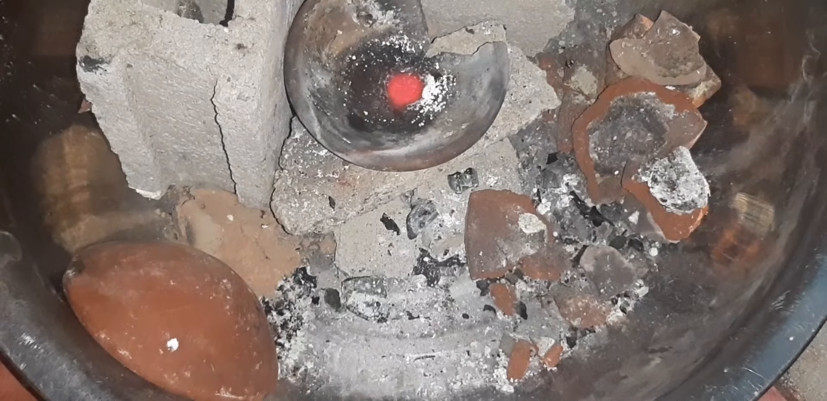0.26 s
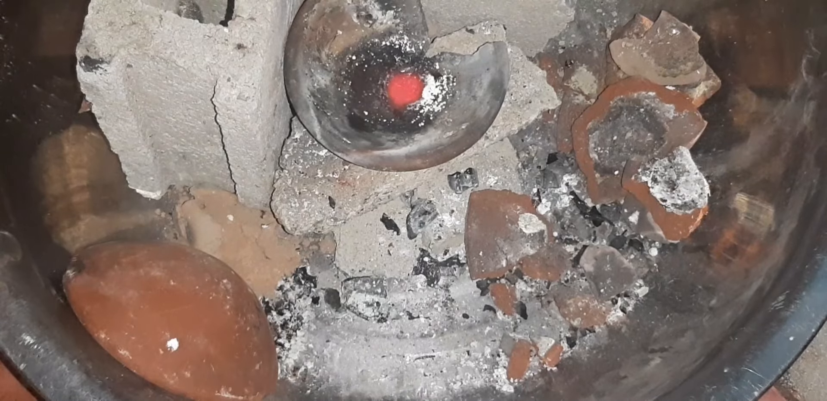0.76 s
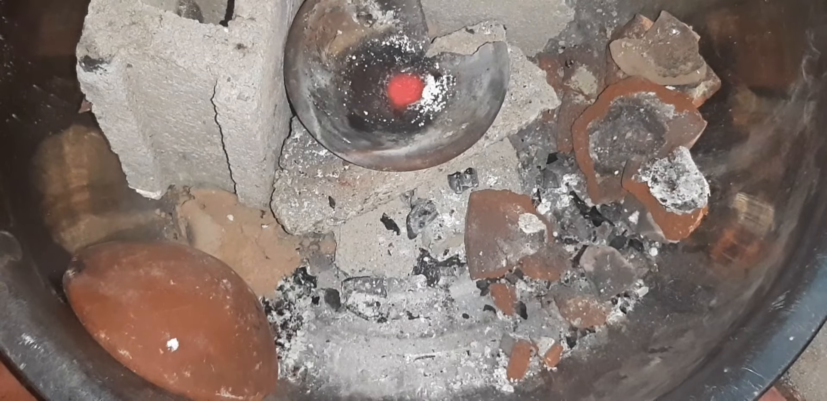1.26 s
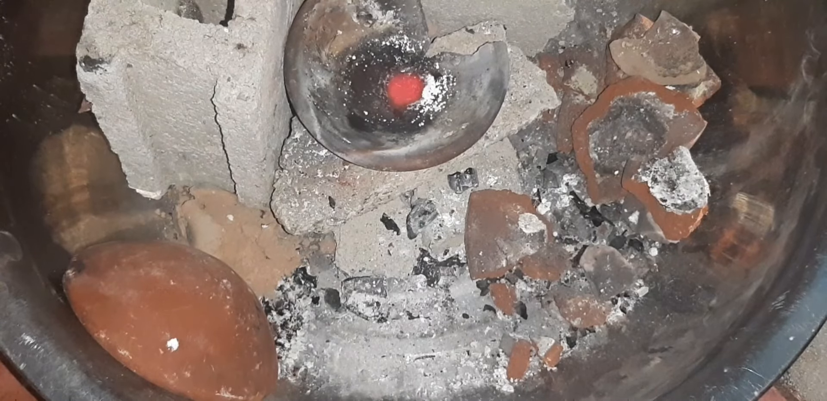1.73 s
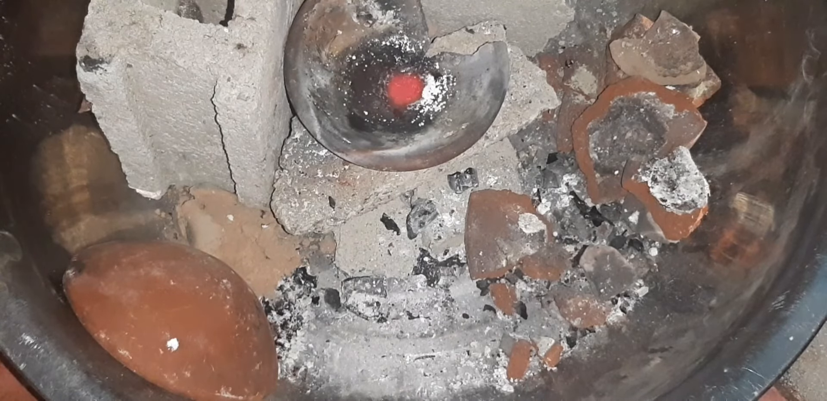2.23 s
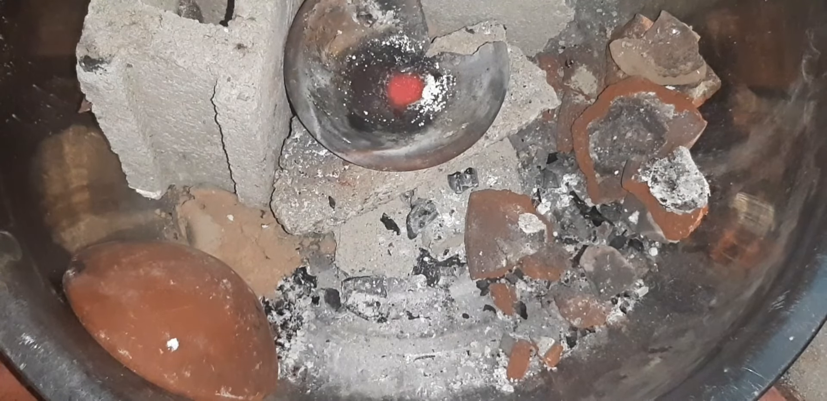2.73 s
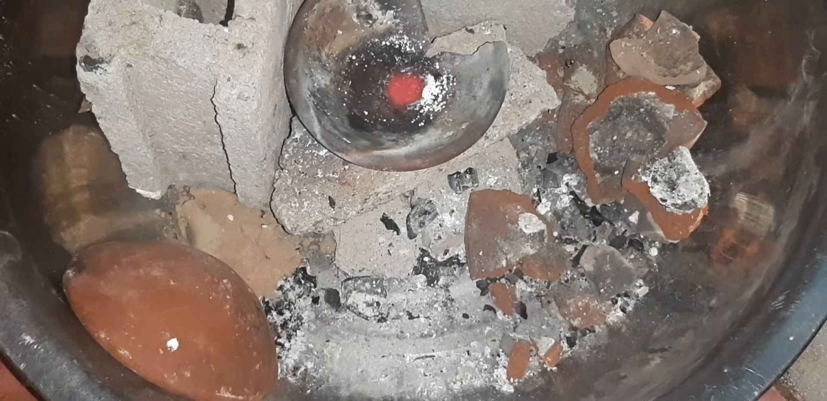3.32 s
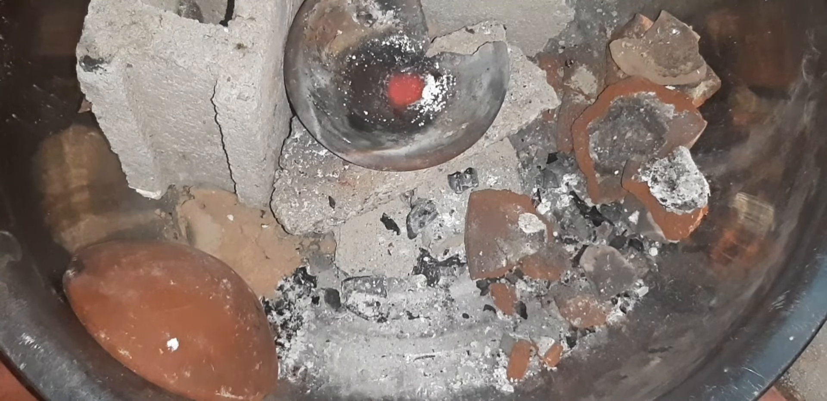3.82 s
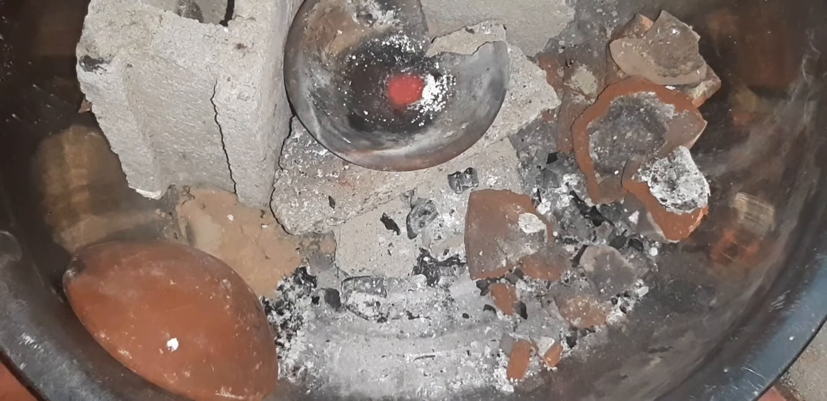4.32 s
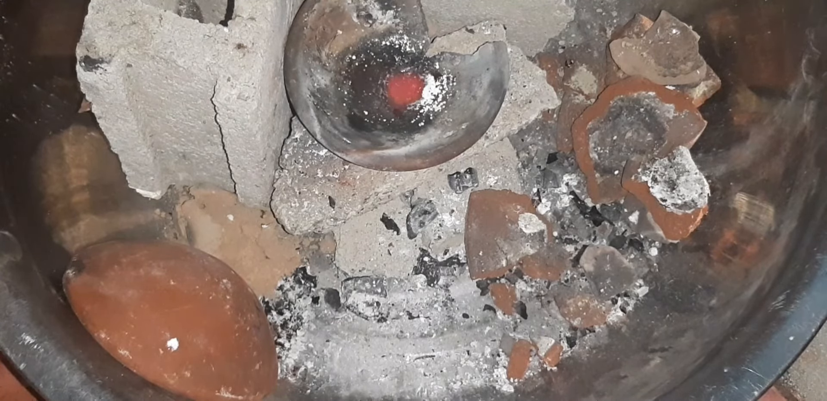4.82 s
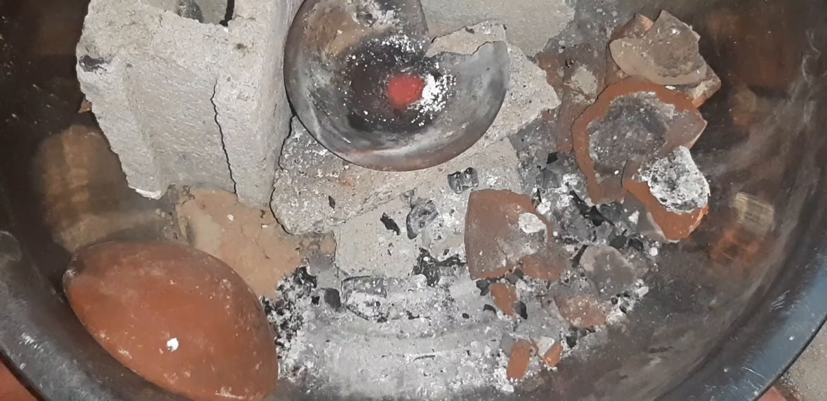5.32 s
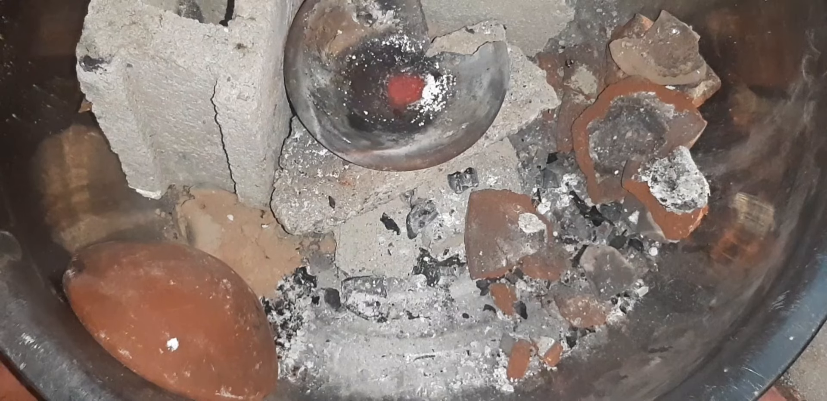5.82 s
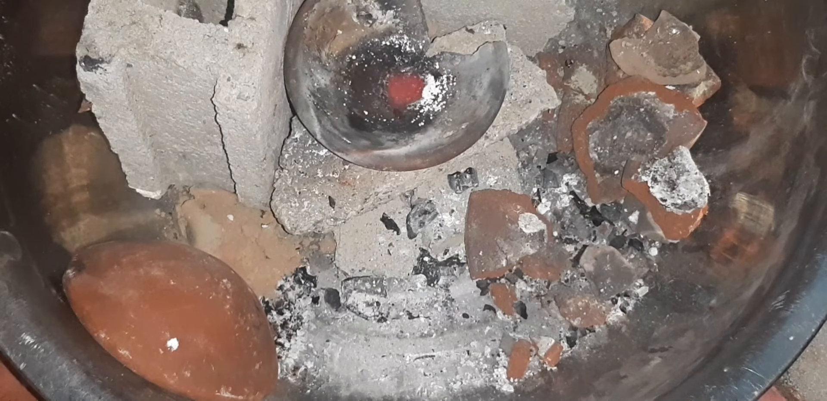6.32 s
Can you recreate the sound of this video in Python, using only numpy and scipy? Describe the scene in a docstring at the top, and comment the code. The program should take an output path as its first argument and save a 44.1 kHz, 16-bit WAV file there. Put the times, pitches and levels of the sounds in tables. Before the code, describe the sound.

In a small room with hard walls, a steamy hiss swells as water boils up around hot metal, then thins into separate spits and pops. Light, irregular clinks and short scrapes of a metal utensil on the dish follow, ending with a couple of knocks that leave the dish ringing softly. The stereo microphone stands a little way off, picking up short room reflections and faint room air.

```python
"""A small hard-walled room; a dish stands a little to the right of a stereo microphone pair, far enough
off that the room outweighs the direct sound. After a few soft scuffs, water meets red-hot metal in the
dish: tiny bursts of steam merge into a hiss, vapour bubbles collapse as the water boils up, and the
sizzle dies away in the sharp pops of the last drops. Then a metal utensil clinks and scrapes lightly
against the dish, which thuds and holds one long note. Behind it, room air and a faint far-off rumble."""
import sys
import numpy as np
from scipy import signal
from scipy.io import wavfile
from scipy.ndimage import uniform_filter1d

SR = 44100
rng = np.random.default_rng(int(sys.argv[2]) if len(sys.argv) > 2 else 0)


def wav_record(signal):
    """Record a signal, one row per channel, as 16-bit PCM in the file named by sys.argv[1]."""
    frames = np.transpose(np.atleast_2d(signal))
    bounded = np.clip(frames, -1, 1)
    # unit amplitude maps onto the largest positive 16-bit level
    quanta = np.round(bounded * 32767).astype(np.int16)
    wavfile.write(sys.argv[1], SR, quanta)


N = 289296
TIME = np.arange(N) / SR

# Levels in all tables are relative; a colour is a spectrum, given as level per unit bandwidth.
# how hard the water boils: t/s, level of the small bubbles/dB
BOIL = [(.97, -60), (1.015, -47), (1.36, -41), (1.85, -38), (1.98, -30), (2.08, -26), (2.23, -37),
        (2.38, -43), (2.75, -92)]
# short resonances of the wet metal: f/Hz, level/dB, t60/s
WET_METAL = [(2730, -5, 0.034), (4130, 4.5, 0.034), (4334, 1.5, 0.015), (4556, -9, 0.024)]
# modes of the utensil, the main pair first: f/Hz, level/dB, t60/s
UTENSIL = [(2720, 8.5, 0.15), (2740, -3, 0.23), (4150, -18.5, 0.18), (4530, -0.5, 0.11), (4592, 2.5, 0.09),
           (7130, -17.5, 0.11), (7500, -31, .18), (8420, -29.5, 0.064), (9600, -39, 0.147),
           (9900, -28.5, 0.137), (12900, -11.5, 0.17), (15200, -29, .13)]
# light contacts: t/s, tick/dB, main modes/dB, upper modes/dB, main pitch/Hz, tick tilt/(dB per octave)
CLINKS = [(3.3343, -40, -65, -52, 2707, 7.5), (3.4215, -43, -50, -44, 2610, -5),
          (3.4635, -34, -76, -40, 2660, -5), (3.5648, -40, -79, -56, 2620, 6),
          (3.6066, -37.5, -72, -50.5, 2800, 5.5), (3.6507, -33, -38, -37.5, 2592, -8),
          (3.7726, -25, -53.5, -88, 2495, 13.5), (4.1053, -22.5, -54.5, -42.5, 2635, 4),
          (4.2785, -46, -81, -72, 2650, 5), (4.3287, -28.5, -63, -62, 2586, 2.5),
          (4.538, -38, -77, -68, 2640, 9.5), (4.6734, -31.5, -67.5, -59, 2740, 2),
          (4.9163, -35.5, -77, -53.5, 2680, -5.5), (4.959, -32, -62.5, -74.5, 2625, 3.5),
          (5.0485, -34, -61.5, -69, 2645, 12), (5.128, -20, -43, -42, 2670, -5),
          (5.1602, -18.5, -34, -22.5, 2600, -4.5), (5.399, -33, -63, -48, 2642, 3.5),
          (5.932, -26.5, -54, -36.5, 2666, -4), (6.023, -22.5, -39, -36, 2697, 5.5),
          (6.142, -38, -76, -74, 2640, 13), (6.2891, -46, -33.5, -32.5, 2700, -1),
          (6.479, -61, -62.5, -59, 2747, -15.5), (6.5342, -51, -56, -67, 2660, 9)]
# firmer knocks that wake the dish: t/s, thud/dB, long note/dB
KNOCKS = [(2.341, -48, -52), (2.787, -70, -59), (3.335, -63, -55.5), (3.652, -61.5, -49.5),
          (5.802, -48, -71), (6.290, -40, -34.5), (6.480, -46, -37.5)]


def steam(gain_db=-3.0, spit_db=-1, fizz_db=3.5, drowned_db=-8.5, cooled_db=3):
    """Countless tiny bursts merge into a hiss; as the metal cools they thin out into separate spits."""
    # strength of the steam jet: t/s, level/dB
    jet = [(.965, -40), (1.015, -30), (1.37, -25.5), (1.7, -25.5), (1.885, -21.5), (1.93, -28), (2.17, -31),
           (2.38, -33.5), (2.6, -48), (2.82, -55), (3.0, -61), (3.3, -79.5)]
    # colour of the hiss: f/Hz, level/dB
    colour = [(500, -35.5), (1800, -21), (2700, -4.5), (3650, -6.5), (4100, 2), (4550, 2), (5000, -5.5),
              (6400, -1.5), (7200, -6.5), (8300, -17.5), (10500, -10.5), (15800, -8)]
    gain, boiling = level(jet), level(BOIL)
    heat = np.sqrt(gain / gain.max())
    spits = grains(per_s=450, spread_db=4)
    bursts = heat * grains(per_s=9000, spread_db=1.5) + (1 - heat) * amp(spit_db) * spits
    hiss = coloured(bursts, colour)
    fizz = treble(hiss, hz=7400)
    # a full boil drowns the top fizz; its share grows as the metal cools
    fizz_share = amp(fizz_db + drowned_db * boiling / boiling.max() + cooled_db * (0.5 - heat))
    return gain * amp(gain_db) * (evened(hiss - fizz) + fizz_share * evened(fizz))


def boil(flutter_db=4.0, gulp_db=17, gulp_s=0.13, flood_at_s=2.11, flood_db_per_s=53.5):
    """Vapour bubbles collapse in quick clumps and sound the water in the dish."""
    # colour of the bubbles: f/Hz, level/dB
    colour = [(50, -45), (110, -24), (160, -24.5), (240, -12), (300, -15), (450, -6.5), (680, -9), (980, 0),
              (1150, -3), (1300, -1.5), (1850, -5.5), (2300, -10.5), (3500, -16.5), (8000, -44)]
    clumps = evened(uniform_filter1d(rng.standard_normal(N), size=700))
    bubbles = coloured(grains(per_s=2500, spread_db=2.0) * amp(flutter_db * clumps), colour)
    small = treble(bubbles, hz=760)
    # large bubbles: a gulp at first contact, then a growing share once the water closes in
    gulp = gulp_db * np.exp(-((TIME - BOIL[0][0]) / gulp_s) ** 2)
    flood = flood_db_per_s * np.maximum(TIME - flood_at_s, 0)
    large_db = np.minimum(-17 + gulp + flood, -8.5)
    return level(BOIL) * (evened(small) + amp(large_db) * evened(bubbles - small))


def sputter(gain_db=-8):
    """Water spattering against the metal keeps it ringing as long as the boil lasts."""
    drops = grains(per_s=760, spread_db=3.0)
    ringing = signal.oaconvolve(drops, ring(WET_METAL, TIME[:SR // 10]))[:N]
    return amp(gain_db) * level(BOIL) * evened(radiated(ringing, hz=1960))


def pops(crack_db=9):
    """Last drops burst on the hot metal and make it ping briefly."""
    # bursting drops: t/s, level/dB, tilt/(dB per octave), ping offset/dB
    drops = [(2.133, -21, 2, -18), (2.341, -17, -6.5, -13), (2.527, -29, -6.5, 4), (2.63, -38.5, -3.5, -14),
             (2.6879, -35.5, -5, 0.5), (2.787, -39.5, -4, -23), (2.866, -34, 2, -16), (2.922, -30, 16, -25),
             (2.949, -39, 1, -11), (2.99, -37, 15, -29), (3.086, -35, 13.5, -36), (3.107, -33.5, 11.5, -46),
             (3.187, -41, 2, -17.5)]
    # colour of a burst: f/Hz, level/dB
    colour = [(60, -53.5), (200, -49.5), (1000, -17.5), (2300, -21), (3100, -2), (4300, 0.5), (6500, 8),
              (8300, -3.5), (11000, 1), (15800, -0.5)]
    out = np.zeros(N)
    ping = radiated(ring(WET_METAL, TIME[:SR // 10]), hz=2000)
    for s, db, tilt_db, ping_db in drops:
        add(out, s, amp(db + crack_db) * crack(colour, tilt_db, decay_s=0.00059))
        add(out, s, amp(db + ping_db) * ping)
    return out


def utensil_ticks(gain_db=7):
    """Each hard contact of utensil and dish gives a brief crack."""
    # colour of a tick: f/Hz, level/dB
    colour = [(100, -50), (400, 10), (1400, -66), (3000, -15), (4500, -2), (6000, 4), (7500, 9.5),
              (8300, -8.5), (10000, -0.5), (13000, 4), (15800, 6)]
    out = np.zeros(N)
    for s, tick_db, _, _, _, tilt_db in CLINKS:
        add(out, s - .001, amp(tick_db + gain_db) * crack(colour, tilt_db, decay_s=0.0021))
    return radiated(out, hz=2200)


def utensil_rings(gain_db=1, main_hz=2680, wander=0.0041):
    """The point of contact shares the blow between main and upper modes; the grip shifts their pitch."""
    out, t = np.zeros(N), TIME[:SR // 2]
    grips = rng.standard_normal(len(CLINKS))
    for (s, _, main_db, upper_db, pitch_hz, _), grip in zip(CLINKS, grips):
        main = ring(UTENSIL[:2], t * pitch_hz / main_hz)
        upper = ring(UTENSIL[2:], t * (1 + wander * grip))
        add(out, s, amp(main_db) * main + amp(upper_db) * upper)
    return radiated(amp(gain_db) * out, hz=2430)


def scrapes(rasp_db=-6, sing_db=-4, soft_hz=2300, main_hz=2680):
    """Stick-slip clicks rasp on the dish; being soft, they sound mostly the utensil's lower modes."""
    # the utensil sliding on the dish: t/s, length/s, level/dB, main pitch/Hz
    slides = [(3.322, 0.029, -50, 2600), (3.402, .035, -55.5, 2510), (3.46, 0.27, -55, 2653),
              (3.638, .13, -42, 2540), (5.749, 0.093, -44.5, 2684), (5.852, 0.08, -49, 2665),
              (6.021, 0.044, -45.5, 2790), (6.286, 0.028, -35, 2717)]
    # colour of the rasp: f/Hz, level/dB
    colour = [(100, -35), (280, -28), (450, -2), (650, -19.5), (1000, -1), (1350, -14.5), (2200, -19),
              (2650, 6), (3300, -9.5), (4500, -8.5), (5300, -21), (7200, -12.5), (8300, -27.5),
              (15000, -17.5)]
    out, t = np.zeros(N), TIME[:SR // 3]
    slips = grains(per_s=410, spread_db=1.5)
    soft_slips = signal.sosfilt(signal.butter(2, soft_hz, fs=SR, output="sos"), slips)
    rasp = evened(coloured(slips, colour))
    upper = ring(UTENSIL[2:], t)
    for s, length, db, pitch_hz in slides:
        body = ring(UTENSIL[:2], t * pitch_hz / main_hz) + upper
        sing = evened(radiated(signal.oaconvolve(soft_slips, body)[:N], hz=1790))
        out += stroke(s, length, db) * (amp(rasp_db) * rasp + amp(sing_db) * sing)
    return out


def grates(width_hz=900):
    """Quick slips excite a contact resonance that rises as the pressure grows."""
    # harder drags: t/s, length/s, level/dB, start f/Hz, end f/Hz
    drags = [(5.782, 0.067, -49.5, 2170, 2540), (5.955, 0.091, -38, 2420, 3000)]
    out, pole = np.zeros(N), np.exp(-np.pi * width_hz / SR)
    slips = grains(per_s=800, spread_db=6)
    for s, length, db, start_hz, end_hz in drags:
        count = int(length * SR)
        glide = np.exp(2j * np.pi * np.cumsum(np.linspace(start_hz, end_hz, count)) / SR)
        # shift down, low-pass, shift back: a resonance that follows the glide
        shifted = slips[int(s * SR):][:count] / glide
        rasp = (glide * signal.lfilter([1], np.poly([pole, pole]), shifted)).real
        add(out, s, amp(db) * evened(rasp) * signal.windows.tukey(count, .5))
    return radiated(out, hz=1600)


def dish_thuds():
    """Firm knocks strike the dish's quickly dying modes and leave a dull thud."""
    # modes of the dish: f/Hz, level/dB, t60/s
    modes = [(432, -36.5, 0.109), (973, 4, 0.12), (1056, 2, 0.12)]
    blows = np.zeros(N)
    for s, db, _ in KNOCKS:
        add(blows, s, amp([db]))
    return radiated(signal.oaconvolve(blows, ring(modes, TIME[:SR // 2]))[:N], hz=400)


def dish_note(hz=955, rise_s=.012, t60_s=1.58, left_db=-8, right_db=-26.5):
    """Each knock feeds the dish's one long note, which is stronger at the left microphone."""
    power, t = np.zeros(N), TIME[:2 * SR]
    fade = np.minimum(t / rise_s, 1) * amp(-60 * t / t60_s)
    for s, _, db in KNOCKS:
        add(power, s, (amp(db) * fade) ** 2)
    return amp([[left_db], [right_db]]) * np.sqrt(power) * np.sin(2 * np.pi * hz * TIME)


def scuffs(gain_db=-1.0):
    """Fine-grained rubbing whose brightness changes from stroke to stroke."""
    # soft handling noises: t/s, length/s, level/dB, treble lift and bass cut/dB
    strokes = [(.001, 0.012, -41.5, -11), (.11, 0.053, -52, 1), (.22, .06, -55, 0.5),
               (.278, 0.013, -52.5, 2.5), (.466, 0.023, -63.5, 12), (0.492, 0.0096, -47, 3.5),
               (0.716, .01, -69.5, 11), (4.53, 0.22, -64.5, 5.5), (4.666, 0.037, -59.5, -8.5),
               (4.72, 0.18, -68.5, -1.5), (4.908, 0.053, -60.5, 12), (5.02, 0.014, -50, 3.5),
               (5.055, 0.072, -66, -5)]
    # colour of the rubbing: f/Hz, level/dB
    colour = [(100, -35), (300, -25.5), (900, -16), (2000, -9.5), (3800, -2.5), (6500, -3), (8300, -23),
              (12000, -20), (15800, -22)]
    rub = evened(coloured(grains(per_s=3400, spread_db=2.5), colour))
    high, out = treble(rub, hz=3020), np.zeros(N)
    for s, length, db, bright_db in strokes:
        out += stroke(s, length, db) * (high * amp(bright_db) + (rub - high) / amp(bright_db))
    return amp(gain_db) * out


def rumble():
    """A dull swell of noise, far off outside."""
    # its rise and fall: t/s, level/dB
    swell = [(4.2, -92), (4.7, -68.5), (5.05, -66.5), (5.6, -74), (6.0, -88.5)]
    # its colour: f/Hz, level/dB
    colour = [(30, -8.5), (110, 2), (170, -10.5), (400, -4), (650, -8), (1000, -20), (2500, -19)]
    return level(swell) * evened(coloured(rng.standard_normal(N), colour))


def room_air(gain_db=-71, side_db=-12, side_treble_db=-2):
    """Quiet room tone: a rumble common to both microphones under a wide faint hiss."""
    # colour of the air: f/Hz, level/dB
    colour = [(15, -39.5), (25, 0.5), (110, 2), (221, -10), (399, -5), (457, -17.5), (631, -6.5),
              (703, -13.5), (1380, -22.5), (3260, -23), (6550, -17), (8350, -28), (15500, -16)]
    mid, side = (evened(coloured(rng.standard_normal(N), colour, size=8192)) for _ in range(2))
    side = amp(side_db) * side + amp(side_treble_db) * treble(side, hz=700)
    return amp(gain_db) * np.array([mid + side, mid - side])


def room(x, direct_db, early_db=-3, early_s=0.032, shared_hz=330, build_s=0.0051, slot=20):
    """Direct sound, close reflections and a diffuse tail that differs per microphone above the bass."""
    # decay of the room: f/Hz, t60/s
    decay = [(200, 0.67), (1000, 0.26), (4000, 0.35), (8000, 0.35), (15000, 0.26)]
    # one reflection of random sign in each slot of samples
    count = SR * 3 // 4 // slot
    arrivals = slot * np.arange(3, count) + rng.integers(0, slot, (2, count - 3))
    taps = np.zeros((2, count * slot))
    np.put_along_axis(taps, arrivals, rng.choice([-1., 1.], arrivals.shape), 1)
    hz, t, bands = signal.stft(taps, SR, nperseg=256)
    bands = bands * amp(-60 * t / at_hz(decay, hz)[:, None])
    shared = np.exp(-(hz[:, None] / shared_hz) ** 2)
    bands[1] = shared * bands[0] + np.sqrt(1 - shared ** 2) * bands[1]
    early_lift = 1 + amp(early_db) * np.exp(-t / early_s)
    response = signal.istft(bands * early_lift, SR, nperseg=256)[1]
    response *= np.minimum(TIME[:response.shape[1]] / build_s, 1)
    response /= np.linalg.norm(response, axis=1, keepdims=True)
    response[[0, 1], [4, 0]] += amp(direct_db)  # the direct sound reaches the left 4 samples later
    return signal.fftconvolve(x[None], response / np.linalg.norm(response[0]), axes=1)[:, :N]


def grains(per_s, spread_db):
    """Random clicks of uneven size."""
    size = amp(spread_db * np.minimum(rng.exponential(1, N), 4))
    return evened(size * rng.choice([-1, 1], N) * (rng.random(N) < per_s / SR))


def crack(colour, tilt_db, decay_s, size=2048):
    """A very short burst, with the energy of one millisecond at rms 1."""
    burst = coloured(rng.standard_normal(size) * np.exp(-TIME[:size] / decay_s), colour, tilt_db)
    return burst / np.linalg.norm(burst) * np.sqrt(SR / 1000)


def ring(modes, t):
    """A struck body's modes as a sum of dying sines."""
    return sum(amp(db - 60 * t / t60) * np.sin(2 * np.pi * hz * t) for hz, db, t60 in modes)


def stroke(s, length, db, grip_s=.005, grip_share=0.068, ease_db=-2, release_db_per_s=329):
    """Gain of one rubbing stroke: it takes hold (long ones more slowly), eases a little and lets go."""
    out, t = np.zeros(N), TIME[:SR // 2]
    attack = np.minimum(t / (grip_s + grip_share * length), 1)
    fade_db = ease_db * np.minimum(t / length, 1) - release_db_per_s * np.maximum(t - length, 0)
    add(out, s, attack * amp(db + fade_db))
    return out


def coloured(x, colour, tilt_db=0, size=2048):
    """Minimum-phase filter with the given spectrum, tilted by dB per octave above 1 kHz."""
    hz = abs(np.fft.fftfreq(size, 1 / SR))
    octaves = np.log2(np.maximum(hz, 1000) / 5000)
    log_gain = np.log(amp(at_hz(colour, hz) + tilt_db * octaves))
    taps = np.fft.ifft(np.exp(np.conj(signal.hilbert(log_gain)))).real
    return signal.oaconvolve(x, taps[:size // 2])[:len(x)]


def radiated(x, hz):
    """Small bodies radiate almost nothing below hz."""
    return signal.sosfilt(signal.butter(3, hz, "high", fs=SR, output="sos"), x)


def treble(x, hz):
    """The part of x above hz."""
    return signal.sosfiltfilt(signal.butter(2, hz, "high", fs=SR, output="sos"), x)


def level(rows):
    """Gain along a (t/s, level/dB) curve, silent outside it."""
    s, db = np.transpose(rows)
    return amp(np.interp(TIME, s, db)) * (TIME >= s[0]) * (TIME <= s[-1])


def at_hz(points, hz):
    """Reads a table along a log-frequency axis."""
    f, value = np.transpose(points)
    return np.interp(np.log(hz + 1), np.log(f), value)


def amp(db):
    """Decibels to gain."""
    return 10 ** (np.asarray(db) / 20)


def evened(x):
    """Scales to rms 1."""
    return x / np.sqrt(np.mean(x ** 2) + 1e-20)


def add(mix, s, sound):
    """Mixes a sound in at time s."""
    part = mix[max(round(s * SR), 0):][:len(sound)]
    part += sound[:len(part)]


def scene(left_db=-1.0, right_db=2.0, ring_left_db=-2, ring_right_db=1):
    """The dish stands a little to the right; each spot on it reaches the microphones by its own paths."""
    quench = sum(room(steam() + boil() + sputter(), direct_db=-7.5) for spot in range(2)) / np.sqrt(2)
    popping = room(pops(), direct_db=-6.5)
    ticking = room(utensil_ticks(), direct_db=-5.5)
    rubbing = room(scrapes() + grates() + scuffs(), direct_db=-7.5)
    ringing = room(utensil_rings(), direct_db=-7.5) * amp([[ring_left_db], [ring_right_db]])
    knocking = room(dish_thuds(), direct_db=-16.0)
    from_dish = quench + popping + ticking + rubbing + ringing + knocking
    return from_dish * amp([[left_db], [right_db]]) + dish_note() + rumble() + room_air()


def record(dry, edge_hz=16050):
    """Both channels pass a steep low-pass."""
    taps = signal.firwin(511, edge_hz, window=("kaiser", 9), fs=SR)
    return signal.oaconvolve(dry, taps[None], "same")


dry = scene()
out = record(dry)
wav_record(out)
```